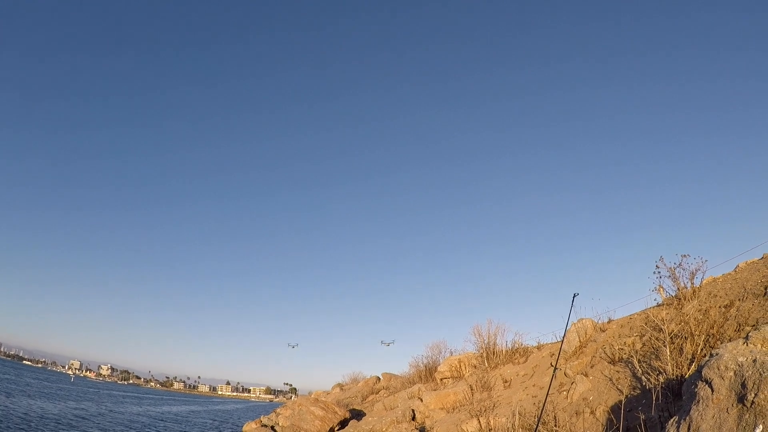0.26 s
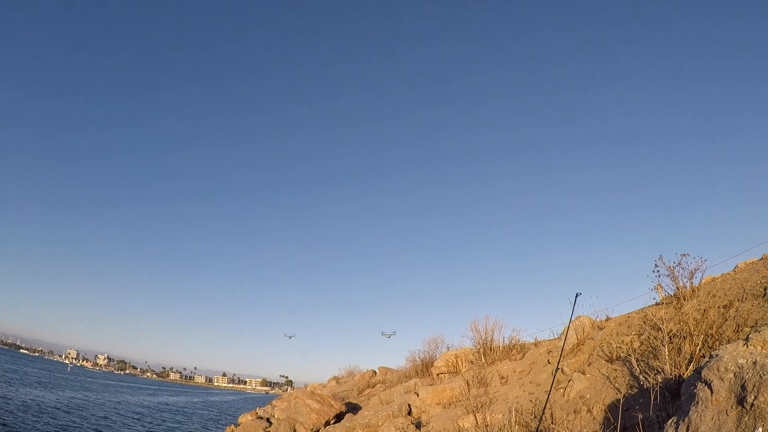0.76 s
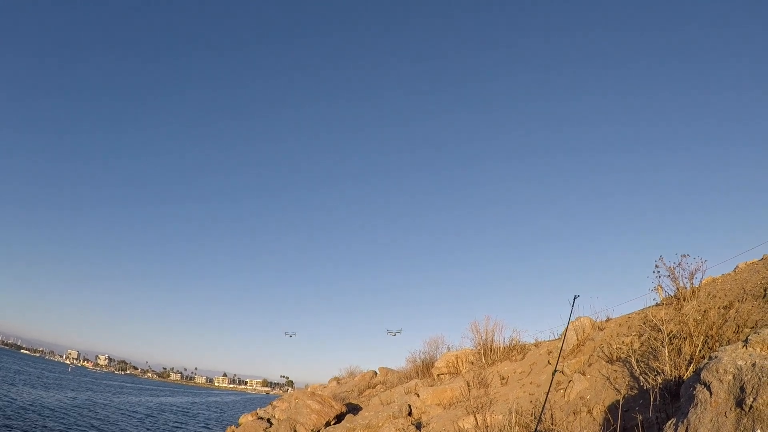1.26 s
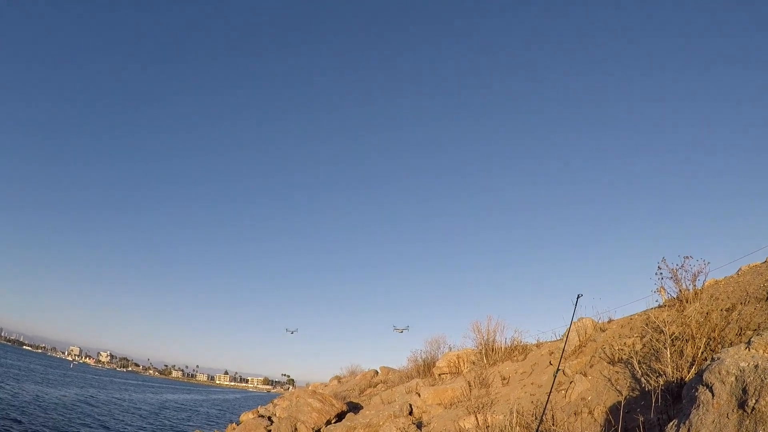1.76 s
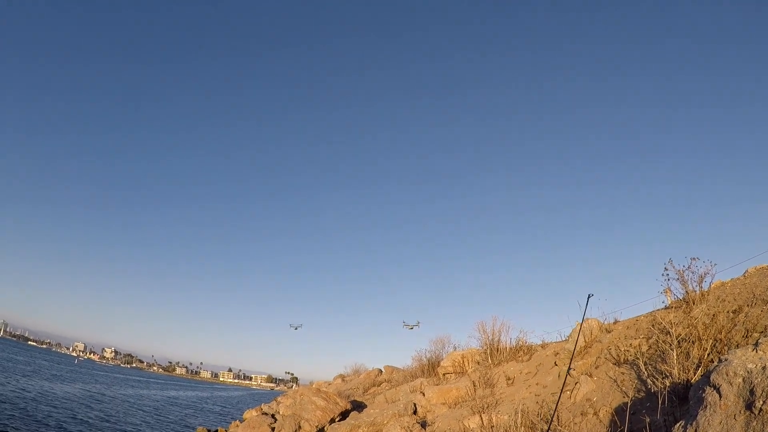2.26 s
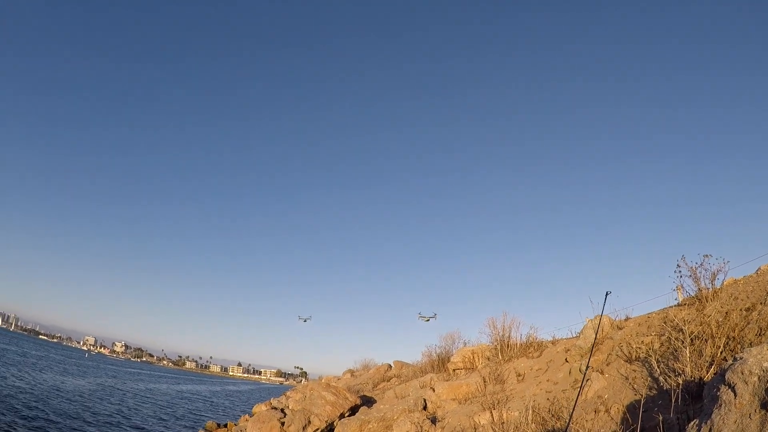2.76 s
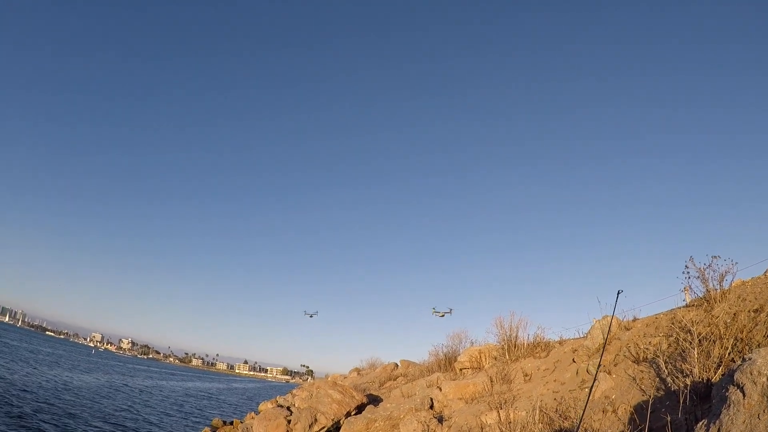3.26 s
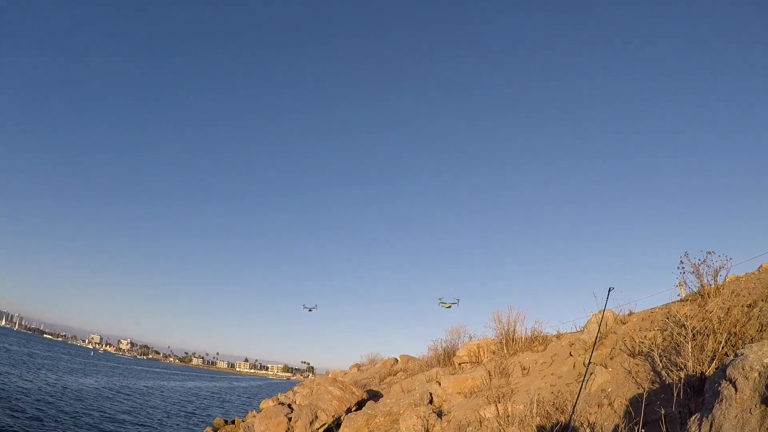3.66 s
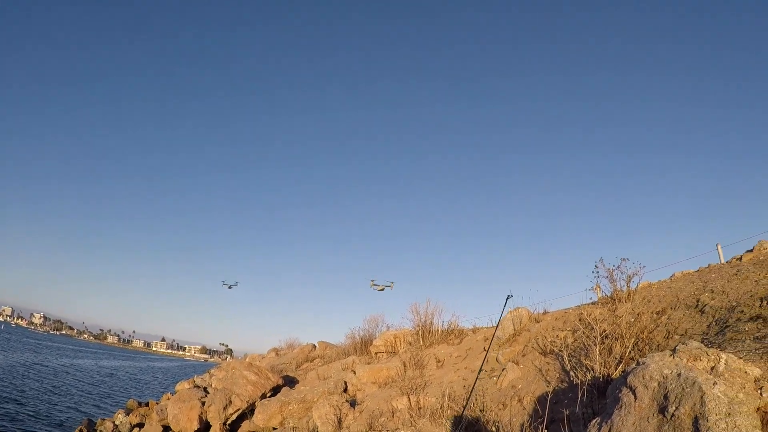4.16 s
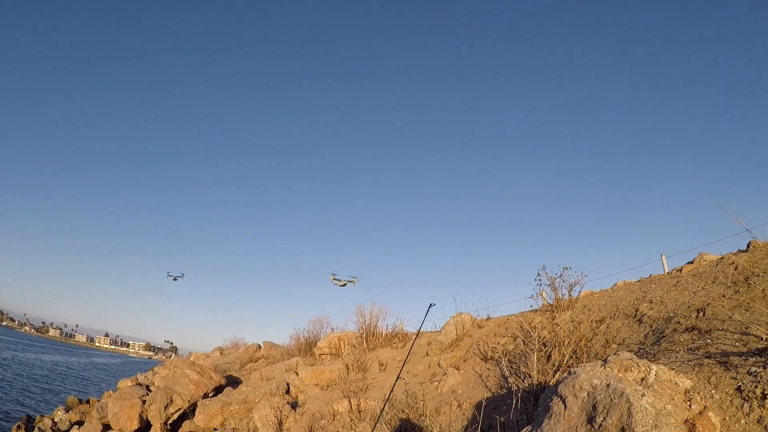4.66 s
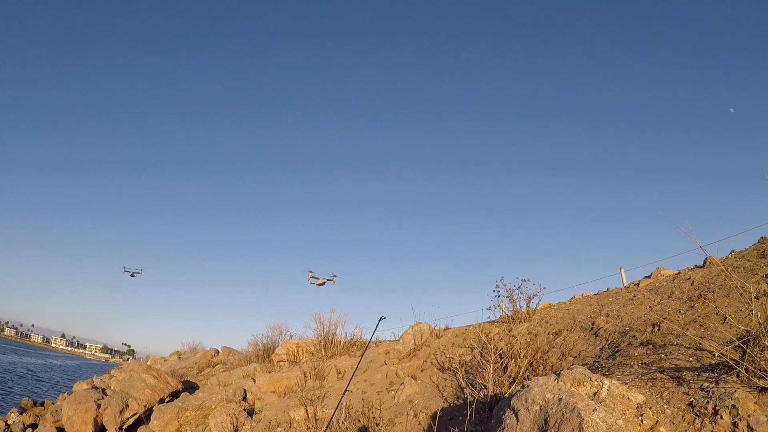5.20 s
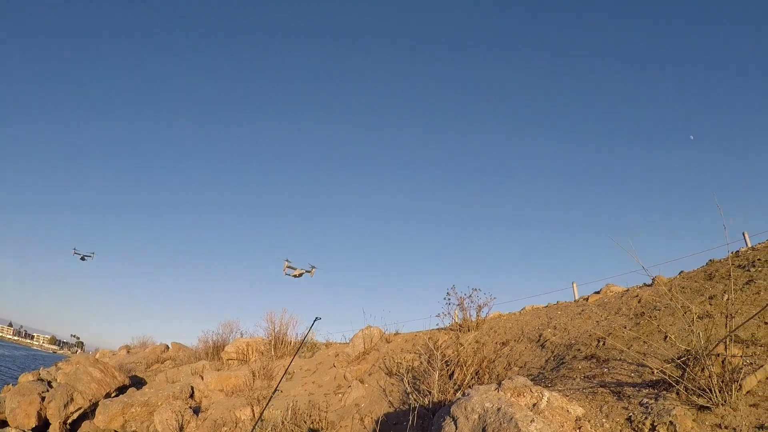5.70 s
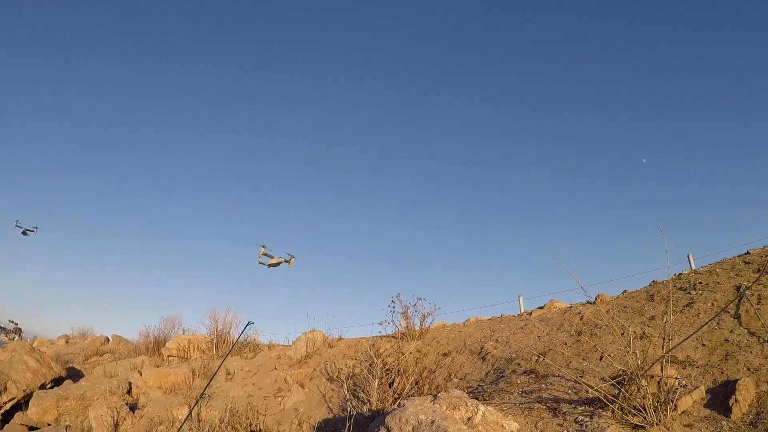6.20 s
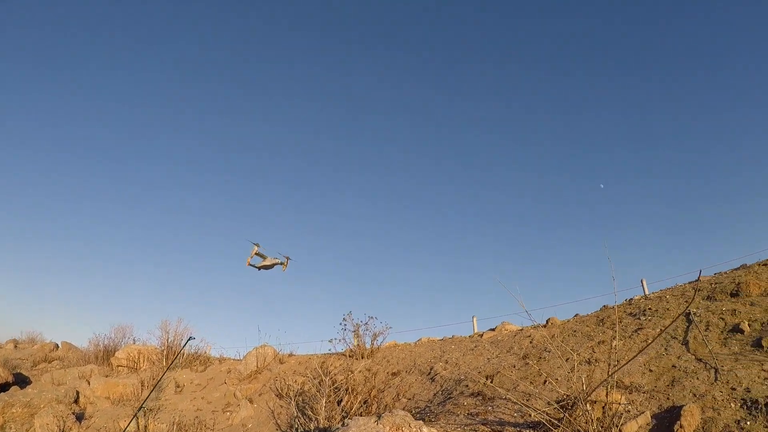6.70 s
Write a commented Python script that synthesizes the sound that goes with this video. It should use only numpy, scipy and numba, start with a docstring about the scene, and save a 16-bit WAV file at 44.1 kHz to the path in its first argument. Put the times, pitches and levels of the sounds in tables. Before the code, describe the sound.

Two heavy tiltrotor aircraft approach over a harbour, deep rotor thumps throbbing and sagging slightly in pitch beneath a growing breathy roar and hiss.

```python
"""A stone jetty in a harbour, a light breeze on an action camera: two tiltrotors come in low and straight.
Four rotors thump at nearly one blade rate; as they near, the pitch sags, the pulses slide through each other
and echo off the stone bank. One rotor slaps its own vortex, and the noise of the wake grows louder.
The breeze carries roar and hiss in swells and bumps the microphone; bands of turbine hiss and whine come through.
Thumps are shaped pulses timed along each flight path; all the rest is coloured noise."""
import sys
import numpy as np
from scipy import signal
from scipy.fft import rfft, irfft, next_fast_len
from scipy.io import wavfile
from scipy.ndimage import uniform_filter1d, minimum_filter1d
from numba import njit

SR = 44100
rng = np.random.default_rng(int(sys.argv[2]) if len(sys.argv) > 2 else 0)


def dump(signal):
    """Clip the signal to [-1, 1] and save it as 16-bit WAV at the path in sys.argv[1]."""
    limited = np.clip(np.atleast_2d(signal).T, -1, 1)
    pcm = np.round(limited * 32767).astype(np.int16)
    wavfile.write(sys.argv[1], SR, pcm)


N = 306054
T = np.arange(N) / SR  # time at the microphone, s
SOUND_M_S, SPEED_M_S = 343, 100  # speed of sound, speed of both aircraft

# straight flight path of each rotor, the leader's two and then the wingman's:
# (blade rate at the rotor [1/s], time abreast less the sound's travel from there [s],
#  distance abreast [m], one thump heard at [s])
FLIGHT_PATHS = [(16.6503, 9.160, 204.6, .0440), (16.5805, 8.626, 109.1, .0273),
                (16.8494, 13.055, 322.7, .0241), (16.8864, 13.138, 379, .0285)]
# thump of each rotor, same order: (starting level [dB], level change [dB/s], starting width [ms],
#  power of relative distance that scales the width [-], skew [rad])
ROTOR_THUMPS = [(-3, 0.09, 4.55, -0.16, 0.95), (-6.5, 1.3465, 5.57, 0.24, 0.67),
                (-3.3, -0.14, 7.02, 0.87, 0.43), (-10.5, 0.81, 9.3, 1, .21)]
# the leader's drone on its way through the air:
# (time [s], half length [s], lift of first rotor [dB], lift of second rotor [dB])
DRONE_SWELLS = [(2.1, 0.24, -0.5, -1.5), (2.9, 0.19, 1, 1), (3.75, .45, -1.5, -5), (4.75, .4, 1.5, 1)]
# the wingman's louder rotor drops a step in level, centred on this time
WINGMAN_DROP_S, WINGMAN_DROP_LENGTH_S, WINGMAN_DROP_DB = 3.3, .4, -3

# reflections from the stone bank: (delay [ms], level [dB])
BANK_ECHOES = [(10.3, -13.5), (18, -19)]
SCATTER_DB, SCATTER_T60_S = -13.5, 1.0

# colours of the wake, dB relative within each: (frequency [Hz], density [dB])
RUMBLE_COLOUR = [(30, -11), (110, -4.0), (220, 1.0), (300, -7), (400, -16.5), (600, -27.5)]
ROAR_COLOUR = [(250, -23), (430, -0.5), (579, 0), (1140, -6.5), (1940, -15), (2800, -21), (3640, -44.5),
               (6160, -120)]
EARLY_HISS_COLOUR = [(1180, -21), (2000, 0), (2810, -9), (3170, -3), (4180, -7), (4610, -9.5), (5200, -21),
                     (6140, -19.5), (7440, -31.5), (9670, -67), (16400, -120)]
HOLLOW_HISS_COLOUR = [(1500, 0), (1950, -0.5), (2750, -9.5), (3050, -1), (3350, -8), (3850, -2.5),
                      (4500, -9), (5200, -19.5), (5850, -12), (6550, -20.5), (7100, -18.5), (7700, -32.5),
                      (8300, -36), (10000, -53)]
# wake at the start, before swells, and its gain for each km the leader nears; the air takes most from the hiss
ROAR_DB, ROAR_DB_PER_KM = -41.5, 7.5
HISS_DB, HISS_DB_PER_KM = -57.5, 19.5
RUMBLE_DB = -24.5
HOLLOW_START_S, HOLLOW_FADE_S = 5.42, 0.8
# swells carried on the breeze:
# (time [s], half length [s], lift of roar [dB], lift of wake hiss [dB], lift of engine hiss [dB])
BREEZE_SWELLS = [(1.09, 0.24, 3.5, -1, -3), (1.55, 0.21, 1.5, 2, 0), (1.934, 0.18, 3, -1.5, 8),
                 (2.62, 0.2, 1.5, 3.5, 7), (2.961, 0.26, 4, 3, 12), (3.89, .12, -2, 1, 5),
                 (4.811, 0.55, 3.5, 5.5, 5.5), (5.821, 0.39, 3.5, 6.5, 3), (6.32, 0.36, -4, 2.5, -2.5),
                 (6.7, 0.23, 2, 3.5, 6)]

# colour of the blade slap: (frequency [Hz], density [dB])
SLAP_COLOUR = [(300, -1.5), (520, 2.0), (900, -10), (1500, -11.0), (2500, -28.5), (4500, -27),
               (7200, -42), (9000, -62.0)]
# spells in which the blades bite harder into the vortex: (time [s], half length [s], lift [dB])
SLAP_SPELLS = [(1.62, .22, 4.5), (3.35, 0.32, 7), (5.25, .4, 6)]
# sounds beamed forward swell and fade as the beam sweeps over:
# (peak time [s], peak level before other lifts [dB], rise [dB/s], fall [dB/s])
SLAP_BEAM = (5.5, -29.5, 1.5, 4)
ENGINE_BEAM = (3.5, -53, 3, 6.5)
SLAP_LEAD_MS, SLAP_LENGTH_MS, SLAP_SCATTER_DB = 3.2, 1.5, 3.5

# colour of the engine hiss: (frequency [Hz], density [dB])
ENGINE_COLOUR = [(1500, -17.5), (2600, -6), (3150, 2), (3500, -3.5), (3950, -2.5), (4900, -7.5), (5280, -5),
                 (5900, -12.5), (6800, -18.5), (7200, -9.5), (7700, -28.5), (9000, -41.5), (12000, -45.5)]
# bands of turbine hiss and whine that come through for a moment:
# (time [s], half length [s], level [dB], centre [Hz], width [Hz])
WHISTLES = [(1.052, .2, -50.5, 3500, 1090), (1.45, 0.14, -53.5, 2000, 700), (1.5, 0.19, -61, 4530, 70),
            (2.55, 0.11, -58, 4610, 70), (2.97, 0.046, -50.5, 7100, 500), (3.0, 0.084, -49.5, 4620, 1500),
            (3.35, .17, -58, 4610, 70)]

# colours of the steady hiss and of the puffs, shared and opposed: (frequency [Hz], density [dB])
STEADY_HISS_COLOUR = [(2000, 5.5), (9000, -5.5), (12000, -15.0), (14000, -31.0)]
PUFF_COLOUR = [(60, 8.5), (200, 8.0), (500, -3), (1300, -14), (2500, -22.5), (5000, -53)]
OPPOSED_PUFF_COLOUR = [(150, -1), (450, 2), (1200, -5.5), (1800, -24), (4000, -47)]
# wind bumps on the microphone:
# (time [s], half length [s], level shared by both ports [dB], level opposed between them [dB])
WIND_BUMPS = [(2.897, .005, -38, -24), (3.785, 0.005, -19, -8), (5.749, 0.0044, -16, -40),
              (5.756, 0.0043, -11.5, -40)]
# the camera goes mono in the breeze: (time [s], stereo width [0-1])
STEREO_WIDTH = [(.6, 0), (.85, 0.3), (4, 0.6), (4.4, 0)]
TOP_HZ = 15800

OPPOSED = np.array([[1], [-1]])  # left and right in opposite sign


def undb(db):
    """Decibels to gain."""
    return 10 ** (np.asarray(db) / 20)


def curves(table):
    """The columns of a table, joined by straight lines in time."""
    s, *columns = np.transpose(table)
    return [np.interp(T, s, column) for column in columns]


def bells(table):
    """Lifts in dB through time, one for each level column: every row is a bell-shaped swell."""
    return sum(np.outer(lifts_db, np.exp(-((T - s) / half_s) ** 2)) for s, half_s, *lifts_db in table)


def walk(rate):
    """Random levels, each held 1 / rate s, then smoothed twice over that time; spread near 1."""
    size = int(SR / rate)
    held = np.repeat(rng.standard_normal(N // size + 1), size)
    return 1.3 * uniform_filter1d(uniform_filter1d(held, size), size)[:N]


def noise(colour):
    """Noise of rms 1 whose spectrum runs through the colour's points and falls away beyond them."""
    hz, db = np.transpose(colour)
    size = next_fast_len(N)
    f = np.maximum(np.fft.rfftfreq(size, 1 / SR), 1)
    gain = undb(np.interp(np.log(f), np.log(hz), db))
    gain = gain * np.minimum(f / hz[0], 1) ** 2 * np.minimum(hz[-1] / f, 1) ** 2
    y = irfft(rfft(rng.standard_normal(size)) * gain, size)[:N]
    return y / y.std()


def wide(colour, side_db):
    """Stereo noise: a common part and a weaker opposed part."""
    return noise(colour) + undb(side_db) * noise(colour) * OPPOSED


def distance(path, t):
    """Metres that the sound heard at time t has travelled from a rotor in straight flight."""
    _, abreast_less_travel_s, abreast_m, _ = path
    mach = SPEED_M_S / SOUND_M_S
    # how far ahead of the abreast point the rotor is now; its sound left from further off
    ahead_m = SPEED_M_S * (abreast_less_travel_s - t) + mach * abreast_m
    root_m = np.sqrt(ahead_m ** 2 + (1 - mach ** 2) * abreast_m ** 2)
    return (mach * ahead_m + root_m) / (1 - mach ** 2)


def blade_clock(path):
    """Time in ms from the nearest blade pulse, and the blade rate heard; the shrinking path shifts it by Doppler."""
    blade_hz, _, _, thump_s = path

    def sent_s(t):
        return t - distance(path, t) / SOUND_M_S

    phase = blade_hz * (sent_s(T) - sent_s(thump_s))
    heard_hz = np.gradient(phase) * SR
    from_pulse = (phase + .5) % 1 - .5
    return from_pulse * 1000 / heard_hz, heard_hz


def rotor(path, thump):
    """One pressure pulse a blade, suction then push; turbulent air shakes its timing and size."""
    db, db_per_s, start_ms, width_power, skew = thump
    ms, heard_hz = blade_clock(path)
    width_ms = start_ms * (distance(path, T) / distance(path, 0)) ** width_power
    shaken_ms = ms + .08 * walk(30)
    pulse = np.real(np.exp(-1j * skew) * (1 - 1j * shaken_ms / width_ms) ** -4.53)
    # to zero midway between blades, so that pulses join without a step
    between_blades = 1 - (2 * ms * heard_hz / 1000) ** 8
    return pulse * between_blades * undb(db + db_per_s * T + .5 * walk(20))


def bank(x):
    """Two reflections from the stone bank, then diffuse scatter that differs between the channels."""
    echoes = sum(undb(db) * np.interp(T - ms / 1000, T, x) for ms, db in BANK_ECHOES)
    tails = rng.standard_normal((2, SR)) * undb(-60 * T[:SR] / SCATTER_T60_S)
    tails /= np.sqrt(np.sum(tails ** 2, axis=1, keepdims=True))
    scatter = signal.fftconvolve(x[None], tails, axes=1)[:, :N]
    return x + echoes + undb(SCATTER_DB) * scatter


def wake(thumps, roar_lift_db, hiss_lift_db):
    """Torn air behind the blades: a rumble that throbs with them, a roar, and a hiss that turns hollow late on."""
    leader = FLIGHT_PATHS[0]
    nearer_km = (distance(leader, 0) - distance(leader, T)) / 1000
    roar_db = ROAR_DB + ROAR_DB_PER_KM * nearer_km + roar_lift_db
    hiss_db = HISS_DB + HISS_DB_PER_KM * nearer_km + hiss_lift_db
    throb = np.sqrt(uniform_filter1d(thumps ** 2, size=400) / np.mean(thumps ** 2) + 1e-9)
    rumble = wide(RUMBLE_COLOUR, side_db=-16.0) * throb * undb(RUMBLE_DB)
    roar = wide(ROAR_COLOUR, side_db=-3) * undb(roar_db + 0.5 * walk(35))
    hollow = np.clip((T - HOLLOW_START_S) / HOLLOW_FADE_S, 0, 1)
    early_hiss = np.sqrt(1 - hollow) * wide(EARLY_HISS_COLOUR, side_db=-21.0)
    hollow_hiss = np.sqrt(hollow) * noise(HOLLOW_HISS_COLOUR)
    return rumble + roar + (early_hiss + hollow_hiss) * undb(hiss_db + 0.5 * walk(40))


def beam(peak_s, peak_db, rise_db_per_s, fall_db_per_s):
    """Level in dB of a sound whose beam sweeps over the listener: a straight rise, then a straight fall."""
    return peak_db - np.maximum(rise_db_per_s * (peak_s - T), fall_db_per_s * (T - peak_s))


def slap(ms):
    """A blade cuts the vortex of the one before: a short rasp of uneven size just ahead of each thump."""
    spell_db, = bells(SLAP_SPELLS)
    burst = np.exp(-((ms + SLAP_LEAD_MS) / SLAP_LENGTH_MS) ** 2)
    level_db = beam(*SLAP_BEAM) + spell_db + SLAP_SCATTER_DB * walk(24)
    return wide(SLAP_COLOUR, side_db=-7.5) * burst * undb(level_db)


def engine(ms, lift_db):
    """Turbine and blade hiss that swells in the moving air, chopped once a blade."""
    # strongest 3.5 ms ahead of each thump
    chop = .7 + .8 * np.exp(-((ms + 3.5) / 8) ** 2) * undb(2.5 * walk(24))
    level_db = beam(*ENGINE_BEAM) + lift_db + 1.0 * walk(300)
    return wide(ENGINE_COLOUR, side_db=-1.5) * chop * undb(level_db)


def wind():
    """A faint steady hiss, and short dull puffs of air on the microphone ports."""
    out = wide(STEADY_HISS_COLOUR, side_db=-2.5) * undb(-66.5)
    puff = noise(PUFF_COLOUR)
    opposed = noise(OPPOSED_PUFF_COLOUR) * OPPOSED
    for s, half_s, shared_db, opposed_db in WIND_BUMPS:
        bump = puff * undb(shared_db) + opposed * undb(opposed_db)
        out += bump * np.exp(-((T - s) / half_s) ** 2)
    return out


def whistles():
    """Turbine hiss and whine: narrow bands of noise that swell and fade."""
    out = 0
    for s, half_s, db, hz, width_hz in WHISTLES:
        band = noise([(hz - width_hz, -25), (hz - width_hz / 2, -3), (hz, 0),
                      (hz + width_hz / 2, -3), (hz + width_hz, -25), (hz + 2 * width_hz, -60)])
        out = out + band * np.exp(-((T - s) / half_s) ** 2) * undb(db)
    return out


def scene():
    """Both aircraft nearing the jetty, in a light wind."""
    rotors = [rotor(path, thump) for path, thump in zip(FLIGHT_PATHS, ROTOR_THUMPS)]
    leader_a, leader_b, wingman_a, wingman_b = rotors
    swell_a_db, swell_b_db = bells(DRONE_SWELLS)
    leader = leader_a * undb(swell_a_db) + leader_b * undb(swell_b_db)
    dropped = np.clip((T - WINGMAN_DROP_S) / WINGMAN_DROP_LENGTH_S + .5, 0, 1)
    wingman = wingman_a * undb(WINGMAN_DROP_DB * dropped) + wingman_b
    thumps = leader + wingman
    wingman_ms, _ = blade_clock(FLIGHT_PATHS[2])
    roar_lift_db, hiss_lift_db, engine_lift_db = bells(BREEZE_SWELLS)
    out = bank(thumps) + wake(thumps, roar_lift_db, hiss_lift_db)
    out = out + slap(wingman_ms) + engine(wingman_ms, engine_lift_db)
    return out + whistles() + wind()


def record(dry):
    """The camera sets the stereo width, limits the loudest thumps and cuts the top."""
    width, = curves(STEREO_WIDTH)
    mid, side = dry.mean(axis=0), (dry[0] - dry[1]) / 2
    # the small share of mid leans the image left as it widens
    y = mid + np.clip(width, 0, 1) * (side + 0.021 * mid) * OPPOSED
    attack_s, release_s, ceiling = .0004, .03, .75
    peak = follow(np.abs(mid), 1 / (attack_s * SR), 1 / (release_s * SR))
    # the gain dips a little ahead of each peak, then is smoothed
    gain = minimum_filter1d(np.minimum(1, ceiling / (peak + 1e-9)), size=130)
    gain = uniform_filter1d(uniform_filter1d(gain, size=90), size=90)
    top_cut = signal.ellip(8, .2, 70, TOP_HZ, fs=SR, output="sos")
    return signal.sosfilt(top_cut, y * gain)


@njit
def follow(x, attack, release):
    """Peak follower: quick to rise, slow to fall."""
    out, level = np.empty(len(x)), 0.
    for i in range(len(x)):
        level += (x[i] - level) * (attack if x[i] > level else release)
        out[i] = level
    return out


dry = scene()
out = record(dry)
dump(out)
```